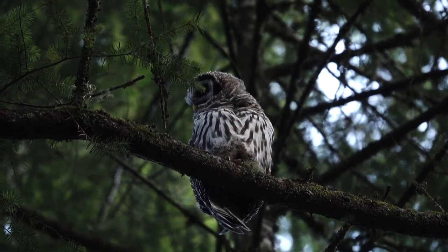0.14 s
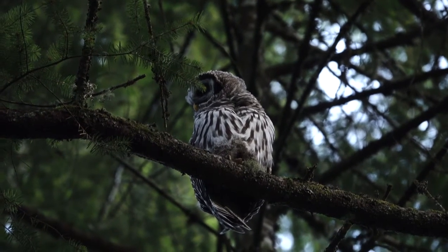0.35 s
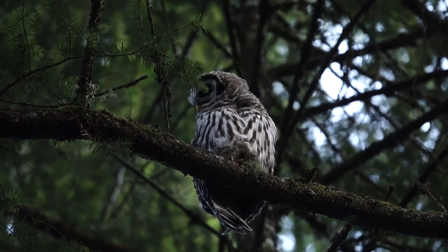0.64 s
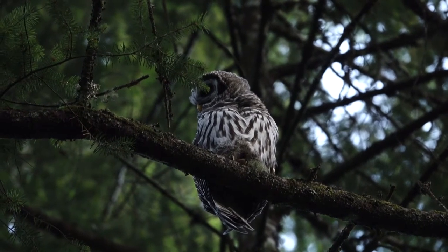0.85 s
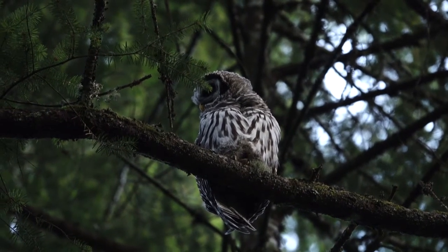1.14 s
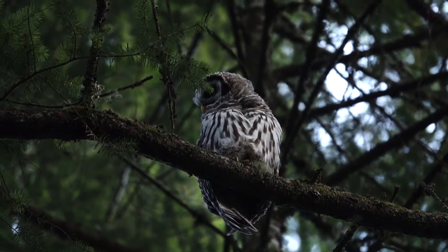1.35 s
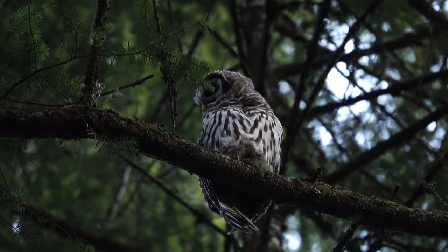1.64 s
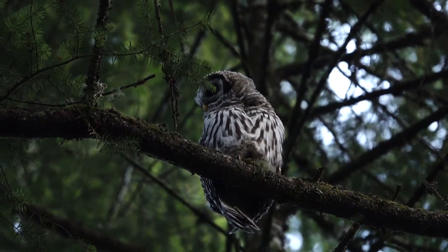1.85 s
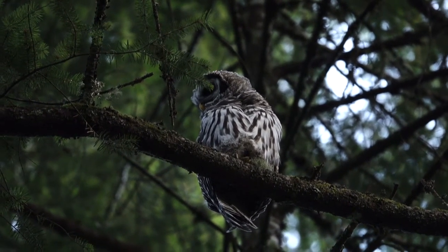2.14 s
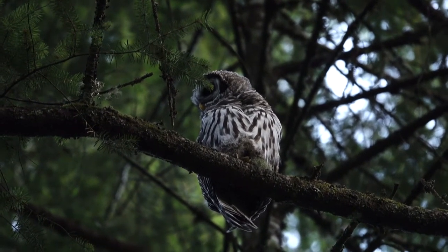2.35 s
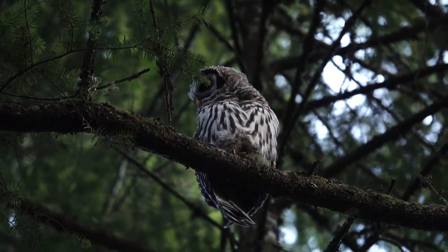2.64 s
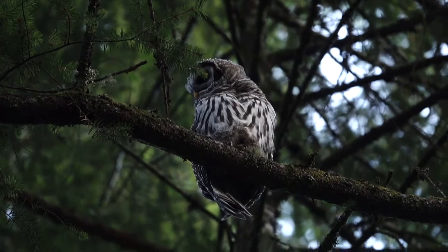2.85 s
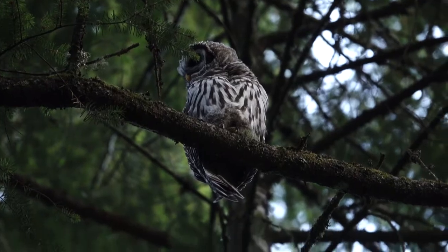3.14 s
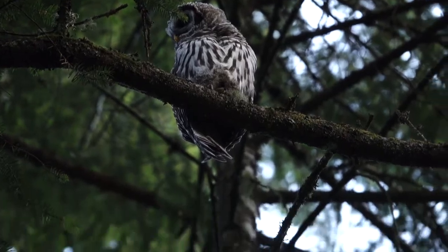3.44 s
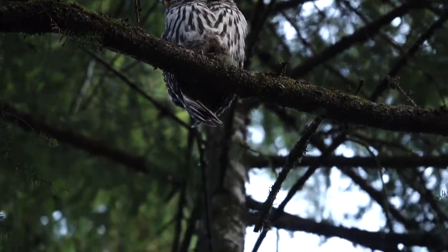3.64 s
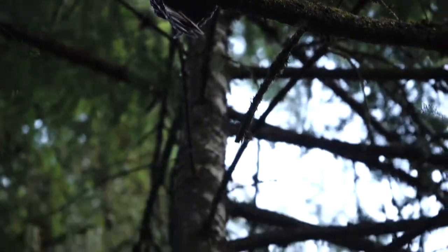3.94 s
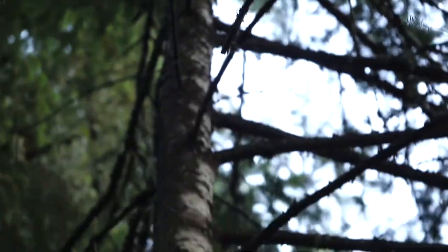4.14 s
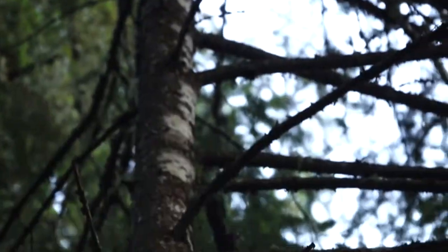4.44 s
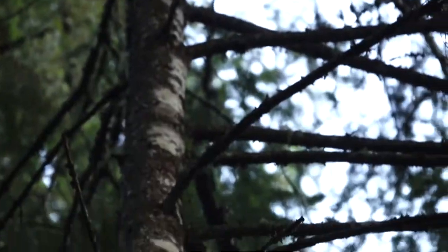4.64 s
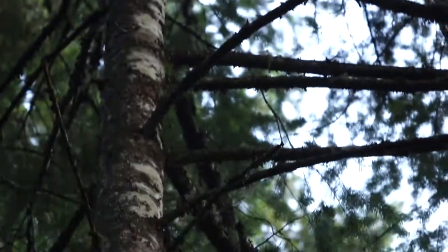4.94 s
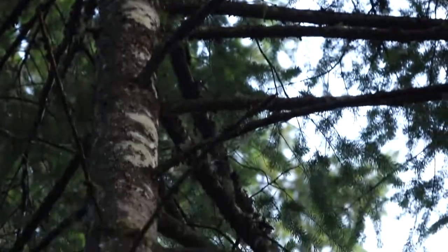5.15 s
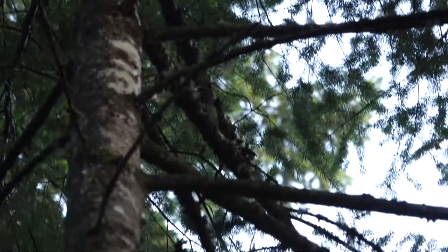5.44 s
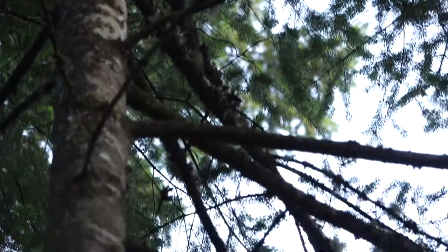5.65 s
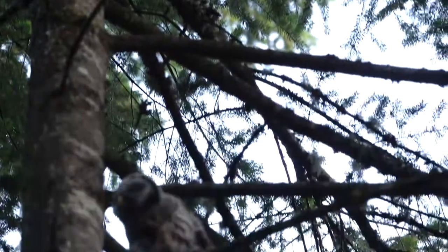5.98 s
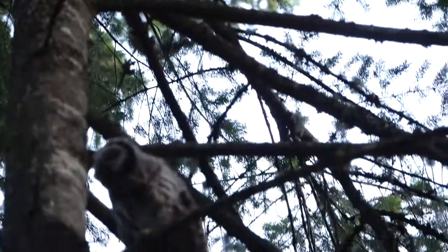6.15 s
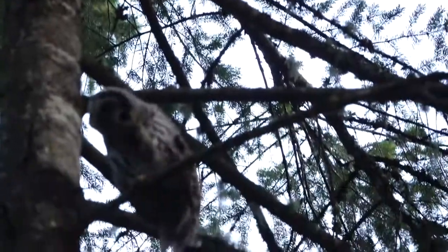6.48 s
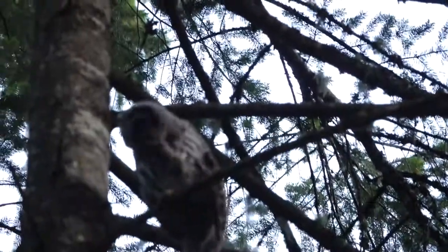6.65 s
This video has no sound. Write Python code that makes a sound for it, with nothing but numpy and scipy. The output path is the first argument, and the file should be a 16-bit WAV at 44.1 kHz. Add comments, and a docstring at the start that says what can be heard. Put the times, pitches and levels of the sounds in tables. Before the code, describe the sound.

Sharp robin chirps and soft tuts, then a young owl's hoarse hiss climbing to a squeal, with woodland echoes, handling bumps and steady hum.

```python
"""One rising, hissing screech of a young owl in a conifer forest, while a robin scolds with sharp peeks and soft tuts.
The owl is a blurred whistle over breath pressed out in puffs; each robin note is two gliding voices that beat.
Soft swishes and a far second robin join in, and the trunks return long thin echoes made of scattered clicks.
The camera hums in its hollow body, ticks and bumps in the hand: noise and short blows that make it ring.
A faint rustle, forest air and microphone hiss lie behind it all."""
import sys
import numpy as np
from scipy import signal
from scipy.fft import rfft, irfft, next_fast_len
from scipy.io import wavfile
from scipy.ndimage import uniform_filter1d

SR = 44100
rng = np.random.default_rng(int(sys.argv[2]) if len(sys.argv) > 2 else 0)


def persist_wave(psi):
    """Save psi, clipped to +-1, as 16-bit WAV."""
    counts = np.round(np.clip(psi, -1, 1) * 32767).astype(np.int16)
    wavfile.write(sys.argv[1], SR, np.atleast_2d(counts).T)


def gain_from_db(level_db):
    """Convert decibel levels to linear amplitude factors (20 dB per decade)."""
    decades = np.asarray(level_db, float) / 20
    return 10 ** decades


N = 300321  # length [samples]


def evened(x):
    """Scales to rms 1."""
    return x / np.sqrt(np.mean(x ** 2) + 1e-20)


def read(points, hz):
    """Reads a curve of (frequency, value) points on a log frequency axis."""
    f, value = np.transpose(points)
    return np.interp(np.log(hz + 0.002), np.log(f + 0.00064), value)


def add(mix, s, sound):
    """Adds a sound at time s, cut at both ends of the mix."""
    at = round(s * SR)
    part = mix[max(at, 0):][:len(sound) + min(at, 0)]
    part += sound[max(-at, 0):][:len(part)]


def above(x, hz):
    """High-pass: weakens what lies below hz."""
    return signal.sosfilt(signal.butter(2, hz, "high", fs=SR, output="sos"), x)


def resonate(x, hz, width):
    """A resonance of gain 1: shifts the pitch curve hz down to zero, smooths, and shifts back."""
    turn = np.exp(2j * np.pi * np.cumsum(hz * np.ones(len(x))) / SR)
    r = np.exp(-np.pi * width / SR)
    return 2 * (turn * signal.lfilter([1 - r], [1, -r], x / turn)).real


def resonate_twice(x, hz, width):
    """Two equal resonances in a row: a steeper peak."""
    return resonate(resonate(x, hz, width), hz, width)


def wander(count, hz):
    """Smooth random motion up to about hz, rms 1."""
    return evened(signal.lfilter(*signal.butter(2, hz, fs=SR), rng.standard_normal(count)))


def ports(x, pan, phase):
    """Two close microphone ports hear one source with a level and phase difference."""
    size = next_fast_len(len(x))
    hz = np.fft.rfftfreq(size, 1 / SR)
    side = np.array([[.5], [-.5]])  # each port takes half of the difference
    spectrum = rfft(x, size) * gain_from_db(side * read(pan, hz)) * np.exp(1j * side * read(phase, hz))
    return irfft(spectrum, size)[:, :len(x)]


def owl(sideband_db=-10):
    """A blurred whistle with sidebands, over breath that is pressed out in irregular puffs."""
    # course of the screech: (time [s], whistle pitch [Hz], whistle level [dB], breath level [dB])
    screech = [(4.13, 6500, -67, -67), (4.169, 5950, -50.5, -61), (4.207, 5655, -49, -55.5),
               (4.245, 5480, -53.5, -55), (4.3, 5420, -52.5, -55.5), (4.36, 5460, -52.5, -55),
               (4.441, 5623, -50, -52.5), (4.55, 5860, -48, -53), (4.64, 5990, -50.5, -52.5),
               (4.9, 6447, -50, -48), (5.079, 6930, -54.5, -45.5), (5.17, 7150, -62, -43),
               (5.2, 7210, -39, -42.5), (5.247, 7270, -60, -41), (5.283, 7530, -43.5, -38),
               (5.32, 7640, -38.5, -38.5), (5.34, 7290, -36, -40.5), (5.36, 5980, -44.5, -42),
               (5.387, 5820, -71, -56)]
    # spectrum of the breath: (frequency [multiple of the whistle pitch], level [dB])
    breath_curve = [(.15, -15), (.35, -13), (.55, -7), (.68, -6), (.77, -1.5), (.88, -3), (1.03, -1.5),
                    (1.15, -21), (1.3, -58)]
    # spectrum of the treble: (frequency [Hz], level [dB])
    treble_curve = [(6000, -12.5), (7800, 8), (8600, 4.5), (10000, -3), (11200, -11), (13500, -16),
                    (14700, -21), (15200, -20)]
    s, *columns = np.transpose(screech)
    t = np.arange(s[0], s[-1] + 0.024, 1 / SR)
    hz, whistle_db, hiss_db = (np.interp(t, s, c) for c in columns)

    # past a breath level of -47 dB the whistle blurs, the mouth gapes and the treble comes up
    push = np.maximum(hiss_db + 47, 0)
    blur_hz = 50 + 3 * push
    treble_db = -16 + 1.33 * push  # against the breath
    throat_db = -3 - 1.2 * push  # the throat band drowns in the breath
    throat_hz = 4600 + 0.17 * np.maximum(hz - 5700, 0)  # rises a little with the high whistle

    low_hz, low_gain = low_voice(t)
    low_turns = np.cumsum(low_hz + 35 * wander(len(t), 54)) / SR
    turns = np.cumsum(hz + blur_hz * wander(len(t), 274)) / SR
    # the low voice beats against the whistle, most strongly 0.25 s after the start
    beat_swell = np.exp(-((t - s[0] - .25) / 0.17) ** 2)
    beat_phase = 2 * np.pi * low_turns + 0.91 * wander(len(t), 105)
    beat = 2 * gain_from_db(sideband_db) * beat_swell * np.cos(beat_phase)
    whistle_gain = np.sqrt(2) * gain_from_db(whistle_db + 3.05 * wander(len(t), 47))
    whistle = whistle_gain * (1 + beat) * np.sin(2 * np.pi * turns)

    f, frame_s, z = signal.stft(rng.standard_normal((2, len(t))), SR, nperseg=256)
    # the breath's top edge rides on the whistle
    z[0] *= gain_from_db(read(breath_curve, f[:, None] / np.interp(frame_s, t - t[0], hz)))
    z[1] *= gain_from_db(read(treble_curve, f))[:, None]
    breath, treble = (evened(v[:len(t)]) for v in signal.istft(z, SR, nperseg=256)[1])
    throat = evened(resonate_twice(rng.standard_normal(len(t)), throat_hz, 380))
    palate = evened(resonate_twice(rng.standard_normal(len(t)), 6950, 500))  # a fixed upper band
    hiss = breath + gain_from_db(throat_db) * throat + gain_from_db(-12) * palate + gain_from_db(treble_db) * treble
    hiss *= gain_from_db(hiss_db)

    puffs = rasp(t, hiss_db)
    fade = np.clip(np.minimum(t - t[0], t[-1] - t) / 0.017, 0, 1)
    low_flicker = gain_from_db(5.4 * wander(len(t), 26.0))
    low = np.sqrt(2) * low_gain * low_flicker * np.sin(2 * np.pi * low_turns)
    out = np.zeros(N)
    add(out, t[0], fade * (puffs * whistle + np.sqrt(puffs) * hiss) + low)
    return out


def rasp(t, effort_db, per_s=190, scatter=.4, snap_s=0.00089):
    """The folds slap open at uneven moments; the harder the push, the deeper the puffs."""
    turns = np.cumsum(per_s * (1 + scatter * wander(len(t), 90))) / SR
    slaps = np.append(np.diff(np.floor(turns)) > 0, False) * gain_from_db(3.3 * rng.standard_normal(len(t)))
    u = np.arange(400) / SR / snap_s
    puffs = evened(abs(signal.oaconvolve(slaps, u * u * np.exp(-u)))[:len(t)])
    share = np.clip(.65 + .03 * (effort_db - effort_db.max()), .35, 1)
    return 1 - share + share * puffs


def low_voice(t):
    """The owl's faint low voice: each note sinks in pitch under one swell; returns pitch and gain."""
    # (start [s], length [s], first pitch [Hz], last pitch [Hz], peak level [dB])
    low_notes = [(4.194, 0.37, 1216, 1151, -60.5), (5.316, 0.093, 1434, 1093, -56)]
    ends = []
    gain = np.zeros(len(t))
    for s, length, first_hz, last_hz, db in low_notes:
        ends += [(s, first_hz), (s + length, last_hz)]
        across = 2 * (t - s) / length - 1  # -1 to 1 over the note
        gain += gain_from_db(db - 4 * across ** 2) * (abs(across) < 1)  # 4 dB down at both ends
    return np.interp(t, *np.transpose(ends)), gain


def robin(lead):
    """The near robin: sharp peeks, and soft tuts that each end in a hoarse catch."""
    # arches of the three kinds of note: (share of the note [0-1], low voice [share of top pitch],
    # its level [dB], high voice [share of top pitch], its level [dB])
    peek, tut, catch = [(0, .33, -33, .62, -26.5), (.19, .54, -24, 1.0, -17.5), (.3, .87, -8, 1.47, -25),
                        (.43, .995, -7.5, 1.66, -22.5), (.54, 1.001, -3, 1.71, -24.5),
                        (.76, .995, -4.5, 1.72, -27.5), (.8, .93, -6.5, 1.71, -37),
                        (.84, .72, -5.5, 1.3, -29), (.88, 0.601, -20.5, 0.92, -17),
                        (.94, 0.36, -21.5, .82, -12), (1.001, 0.2, -28, 0.63, -6)], [(0, 0.765, -17, 1.38, -12), (.2, 0.95, -8, 1.59, -5.5),
                                      (.4, 1.02, -5, 1.63, -7.5), (.65, .94, -6, 1.5, -8),
                                      (1.001, 0.78, -8, 1.3, -18)], [(0, 0.86, -17, 1.62, -12), (.4, 1, -16, 1.56, -2),
                                                   (1.001, .72, -15, 1.3, -6)]
    # when they sound: (start [s], length [s], top pitch [Hz], level [dB])
    peeks, tuts = [(-.14, 0.098, 3543, -41), (0.437, 0.085, 3455, -34.5), (2.669, 0.083, 3450, -37.5),
                   (3.99, 0.084, 3470, -39.5), (4.663, .087, 3486, -34.5), (5.953, 0.084, 3500, -36.5)], [(2.997, 0.036, 1545, -55), (3.238, 0.035, 1536, -56),
                                  (3.478, 0.029, 1560, -56.5)]
    # a catch starts at 0.66 of its tut, lasts 0.018 s and is set 4 dB lower
    catches = [(s + .66 * length, .018, hz, db - 4) for s, length, hz, db in tuts]
    return sing(peek, peeks, lead) + sing(tut, tuts, lead) + sing(catch, catches, lead)


def far_robin(lead):
    """A second robin chirps from far off, equally in both channels."""
    # arch of the chirp: (share of the note [0-1], low voice [share of top pitch],
    # its level [dB], high voice [share of top pitch], its level [dB])
    chirp = [(0, 0.72, -12, 1.1, -34), (.22, 1.1, 4, 1.5, -28), (.45, 1.001, 3.5, 1.7, -28),
             (.7, .97, -1, 1.45, -30), (1.001, 0.92, -10, 1.5, -40)]
    # (start [s], length [s], top pitch [Hz], level [dB])
    chirps = [(3.639, 0.043, 2880, -68), (6.64, 0.033, 2960, -72.5)]
    return np.array([sing(chirp, chirps, lead)] * 2)


def sing(shape, rows, lead):
    """All notes of one kind, on a line that starts lead seconds early."""
    out = np.zeros(N + round(lead * SR))
    for s, *rest in rows:
        add(out, s + lead, note(shape, *rest))
    return out


def note(shape, length, top_hz, db, beat_db=-14, rough=1.0, breath_db=-3, breath_width=900):
    """The two halves of the syrinx sing two arches that beat; fast glides turn hoarse and breathy."""
    # how the beak lets through the beat of the two voices: (frequency [Hz], level [dB])
    beak = [(800, -28), (2230, -28), (2400, -3), (4000, -8)]
    share, *columns = np.transpose(shape)
    u = np.linspace(0, 1, round(length * SR))
    low, low_db, high, high_db = (uniform_filter1d(np.interp(u, share, c), 100, mode="nearest")
                                  for c in columns)
    glide = np.minimum(abs(np.gradient(high, u)) / 4, 1)
    hoarse = 1 + rough * glide * wander(len(u), 720)
    a, b = (2 * np.pi * np.cumsum(top_hz * v) / SR for v in (low, high))
    beats = gain_from_db(read(beak, top_hz * abs(high - low))) * np.sin(b - a)  # difference tone
    breath = evened(resonate_twice(rng.standard_normal(len(u)), top_hz * high, breath_width))
    tones = gain_from_db(low_db) * np.sin(a)
    tones += hoarse * (gain_from_db(high_db) * np.sin(b) + gain_from_db(beat_db + low_db) * beats)
    tones += gain_from_db(breath_db + high_db) * glide * breath
    return np.sqrt(2) * gain_from_db(db) * tones * signal.windows.tukey(len(u), .1)


def swishes():
    """A few soft swishes of airy noise in one broad band, perhaps wing beats."""
    # (middle [s], level [dB])
    strokes = [(.55, -66), (.597, -66), (.642, -60), (.695, -65)]
    hz, width_hz, length_s = 3760, 1300, 0.039
    out, size = np.zeros(N), round(length_s * SR)
    for s, db in strokes:
        noise = resonate(rng.standard_normal(4000), hz, width_hz * 2)
        swish = evened(resonate_twice(noise, hz, width_hz))
        add(out, s - length_s / 2, gain_from_db(db) * swish[-size:] * np.hanning(size))
    return out


def forest(x, tail_db=-14):
    """Sparse scattering off trunks that swells, then dies band by band, and a few single echoes."""
    # how long echoes last: (frequency [Hz], time to fall by 60 dB [s])
    decay = [(800, 1.36), (2500, 0.85), (3500, 0.95), (4300, 0.56), (5900, 0.5), (7800, 0.61),
             (11000, 0.32)]
    # how strongly bark and needles scatter: (frequency [Hz], level [dB])
    scatter = [(1500, 0.5), (3500, 0), (4500, 2.5), (6000, 6.5), (7800, -3.5), (12000, 3)]
    # single trunks: (delay [s], level [dB])
    echoes = [(.062, -28), (0.094, -40), (0.146, -48), (.2, -38)]
    taps = np.zeros((2, SR))
    at = np.arange(200, SR - 20, 10) + rng.integers(0, 10, (2, (SR - 211) // 10))
    np.put_along_axis(taps, at, rng.choice([-1., 1.], at.shape), 1)
    hz, t, z = signal.stft(taps, SR, nperseg=256)
    swell = np.minimum(t / .05, 1)
    band_db = read(scatter, hz)[:, None] - 60 * t / read(decay, hz)[:, None]
    tail = signal.istft(z * gain_from_db(band_db) * swell, SR, nperseg=256)[1]
    tail *= gain_from_db(tail_db) / np.linalg.norm(tail[0])
    for delay, db in echoes:  # rough bark smears each echo over a few ms
        bark = rng.standard_normal(300) * np.hanning(300)
        tail[:, round(delay * SR):][:, :300] += gain_from_db(db) * bark / np.linalg.norm(bark)
    return signal.fftconvolve(x, tail, axes=1)[:, :x.shape[1]]


def camera():
    """Hum, ticks, bumps and rumble come from one body close to both ports; the rustle differs per side."""
    # (frequency [Hz], left minus right [dB]) and (frequency [Hz], lead of the left [rad])
    pan, phase = [(60, 0), (300, 0.4), (930, 1.5), (3700, 11.5), (9000, -12)], [(60, -0.5), (170, -0.7), (500, -1.65), (1400, -1.985), (6000, 1.5)]
    return ports(motor_hum() + ticks() + bumps() + rumble(), pan, phase) + rustle()


def hollow_body(x):
    """The camera's hollow body rings at several pitches."""
    # (frequency [Hz], width before broadening [Hz], relative level [dB])
    modes = [(246.2, 28.4, -16), (359.3, 47.5, -13), (564.9, 53.2, 2), (608.8, 38, -4.5), (801.4, 53, 3),
             (855.7, 50, -1.5), (1151, 64, -18)]
    return sum(gain_from_db(db) * resonate_twice(x, hz, 1.245 * w) / np.sqrt(w) for hz, w, db in modes)


def motor_hum(lumpy_db=2.0):
    """A small motor's lumpy noise rings the hollow body."""
    # (time [s], level [dB])
    hum_level = [(0.0, -48.5), (2.9, -49), (3.4, -47), (3.9, -50), (4.6, -48.5), (5.6, -51), (6.26, -50),
                 (6.81, -56.5)]
    noise = rng.standard_normal(N) * gain_from_db(lumpy_db * wander(N, 43))
    return evened(hollow_body(noise)) * gain_from_db(np.interp(np.arange(N) / SR, *np.transpose(hum_level)))


def ticks(ring_db=-6):
    """Each tick of the casing is a soft blow, a ring of the hollow body and a sharp noisy edge."""
    # (time [s], strength [dB], sharp edge against it [dB], share of the low hollow [0-1])
    tick_rows = [(0.9071, -38.5, -34, 1), (1.0078, -45, -8.5, 0.93), (1.035, -42.5, -20, 1),
                 (1.0434, -63, -1, .3), (3.901, -22.5, -31.5, 0.48), (4.9182, -32.5, -17.5, 0.63)]
    # how the casing rings: (frequency [Hz], width before doubling [Hz], relative level [dB])
    casing = [(1058, 126, 0), (1700, 550, -12.5)]
    # one narrow ring of the edge: (frequency [Hz], width [Hz], relative level [dB])
    edge_hz, edge_width, edge_ring_db = (3670, 160, -3.1)
    blows, hollows, edges = np.zeros((3, N))
    u = np.arange(200) / SR
    soft = np.hanning(14) / np.hanning(14).sum()
    for s, db, edge_db, hollow in tick_rows:
        add(blows, s, gain_from_db(db) * soft)
        add(hollows, s, abs(hollow) * gain_from_db(np.array([db])))
        add(edges, s, gain_from_db(db + edge_db) * rng.standard_normal(200) * np.exp(-u / 0.0015))
    knock = sum(gain_from_db(db) * resonate_twice(blows, hz, 2 * w) * SR / (2 * np.pi * w) for hz, w, db in casing)
    knock += gain_from_db(ring_db) * 1500 * hollow_body(hollows)
    knock += 3.2 * resonate_twice(edges, 3000, 2800) + gain_from_db(-21) * above(edges, 5000)
    knock += gain_from_db(edge_ring_db) * resonate(edges, edge_hz, edge_width) * np.sqrt(SR / edge_width)
    return knock


def bumps(hz=172.5):
    """Hands on the casing: each bump is a few dying turns of one low tone."""
    # (time [s], level before the fade [dB])
    bump_rows = [(0.687, -59), (1.023, -51), (3.318, -48), (4.698, -55), (4.911, -46.5), (5.053, -48.5),
                 (5.257, -51), (5.454, -45.5), (5.827, -46), (5.922, -55), (6.248, -47.5)]
    turns = np.arange(round(3.5 * SR / hz)) * hz / SR
    bump = np.sin(2 * np.pi * turns) * np.minimum(turns / 0.76, 1) * np.exp(-turns / 0.99)
    out = np.zeros(N)
    for s, db in bump_rows:
        add(out, s, gain_from_db(db) * bump)
    return out


def rumble():
    """Low noise in a band around 114 Hz whose level wanders slowly."""
    low_noise = evened(resonate_twice(rng.standard_normal(N), 114, 128))
    return low_noise * gain_from_db(-80.5 + 2.2 * wander(N, 7.4))


def rustle():
    """A faint rustle of broad noise that sinks, then grows as the camera swings."""
    # (time [s], level [dB])
    rustle_level = [(0, -77), (2.4, -90), (3.0, -72), (4.8, -71), (6.81, -67)]
    gain = gain_from_db(np.interp(np.arange(N) / SR, *np.transpose(rustle_level)))
    sides = rng.standard_normal((2, N))
    return np.array([evened(above(resonate_twice(v, 1070, 900), 230)) * gain for v in sides])


def air():
    """Faint forest air and microphone hiss: shaped noise with drifting patches."""
    # spectrum: (frequency [Hz], relative level [dB per Hz])
    air_curve = [(25, -11.5), (60, -9.5), (170, -14), (400, -1), (900, -0.5), (1300, -20), (1800, -11.5),
                 (2500, -16), (4000, -20), (8000, -24), (15000, -25.5)]
    # how alike the sides are: (frequency [Hz], left-right likeness [0-1])
    likeness = [(60, 0.9), (400, 0.2), (1100, 0.34), (2400, 0.052), (5000, 0.31), (14000, 0.51)]
    level_db, patchy_db = -65, 1.3
    frames, hz = N // 256 + 5, np.fft.rfftfreq(1024, 1 / SR)
    a, b, c, d, patches = rng.standard_normal((frames, 513, 5)).T
    patches = evened(uniform_filter1d(uniform_filter1d(patches, 14, 0), 14, 1))
    same = np.clip(read(likeness, hz), -1, 1)[:, None]
    left = a + 1j * b
    right = same * left + np.sqrt(1 - same ** 2) * (c + 1j * d)
    z = np.array([left, right]) * gain_from_db(read(air_curve, hz)[:, None] + patchy_db * patches)
    return gain_from_db(level_db) * evened(signal.istft(z, nperseg=1024, noverlap=768)[1][:, :N])


def scene():
    """Birds to the right with their echoes, a far robin, the camera's own noises and the air."""
    # (frequency [Hz], left minus right [dB]) and (frequency [Hz], lead of the left [rad])
    bird_pan, bird_phase = [(60, -5), (110, -3), (200, 7), (370, -10), (690, 10), (1270, -3), (2340, -5.5),
                            (4300, -7.5), (7910, -11), (14600, -33.5)], [(1200, 1.67), (3500, 1.27), (6000, 0.95), (9000, 1.1),
                                              (14000, 0.103)]
    lead = .2  # [s] the birds start early, so that the first peek's echoes are there from the start
    near = robin(lead)
    add(near, lead, owl() + swishes())
    near = ports(near, bird_pan, bird_phase)
    far = far_robin(lead)
    birds = near + far + forest(near + gain_from_db(2) * far)  # far calls sound wetter: 2 dB more echo
    return above(birds[:, -N:], 340) + camera() + air()


def low_pass(x):
    """Removes everything above the highest recorded frequency."""
    return signal.sosfilt(signal.butter(12, 15170, fs=SR, output="sos"), x)


def record(dry):
    """Turns the finished mix into the sound that is written out."""
    return low_pass(dry)


dry = scene()
out = record(dry)
persist_wave(out)
```